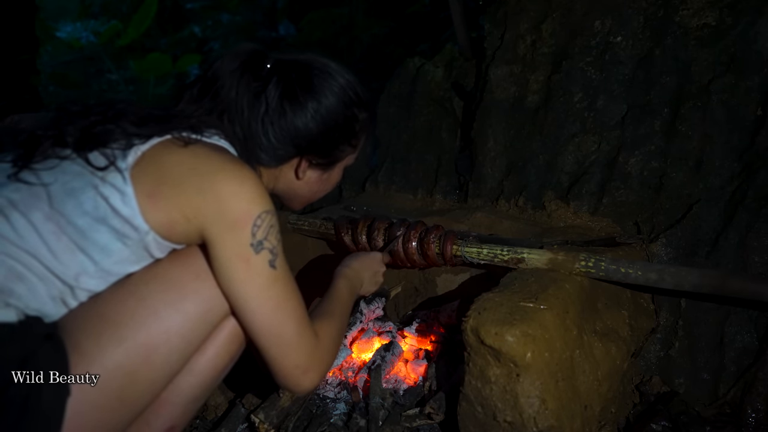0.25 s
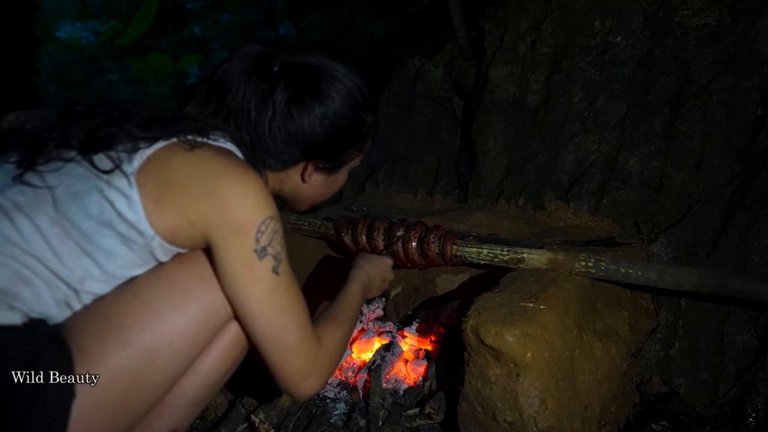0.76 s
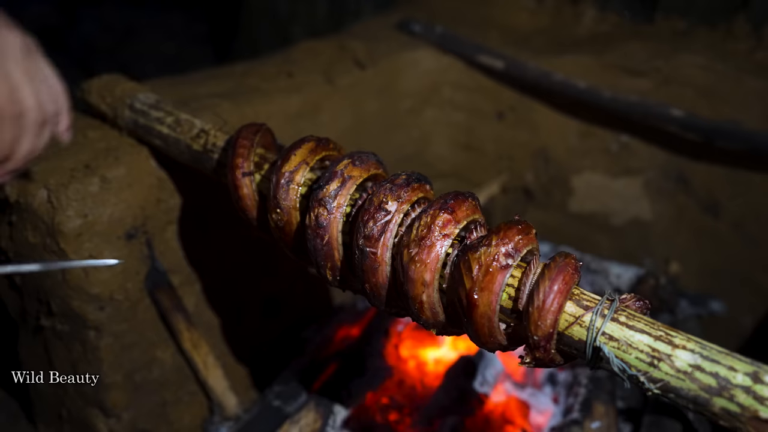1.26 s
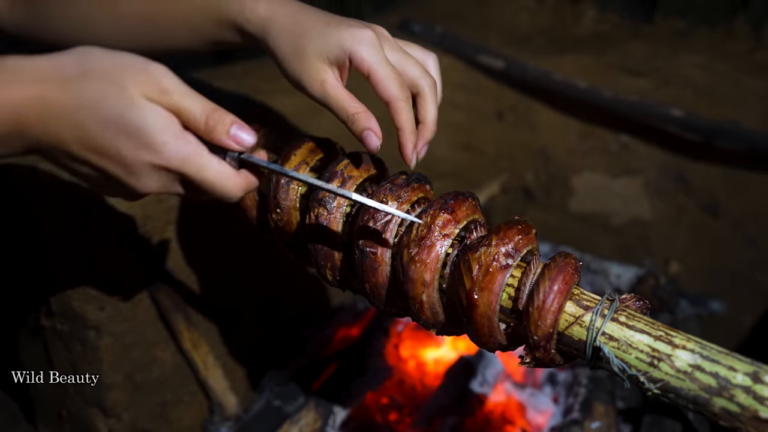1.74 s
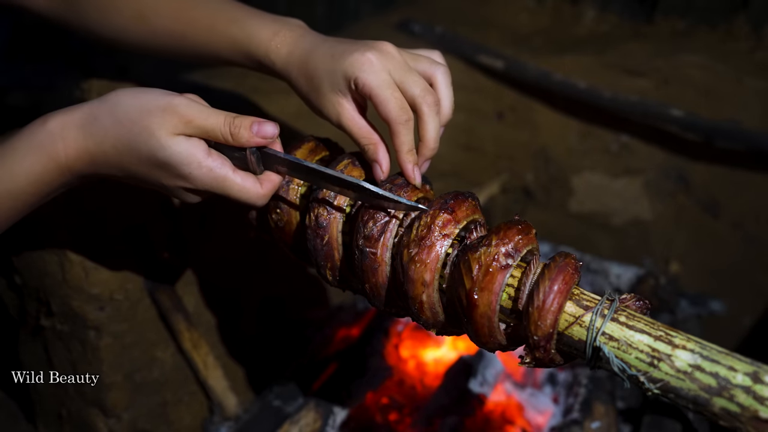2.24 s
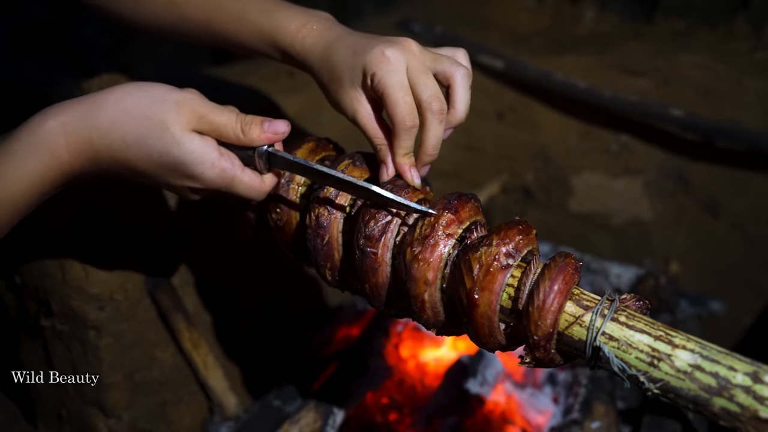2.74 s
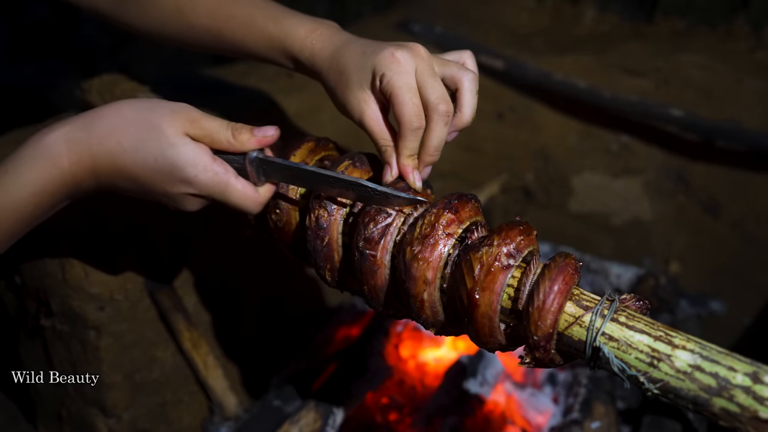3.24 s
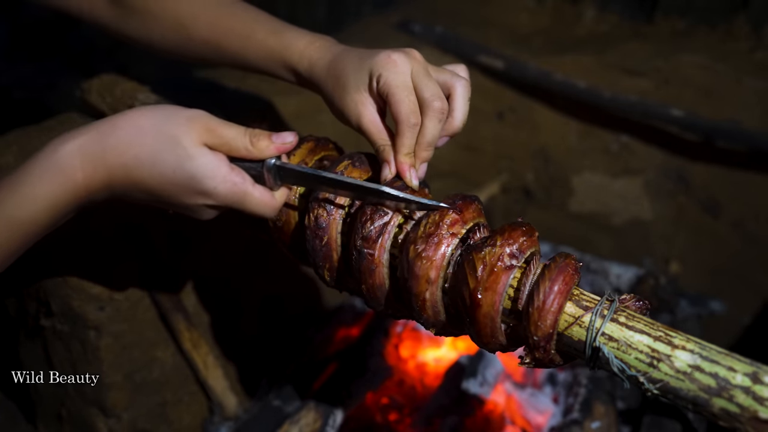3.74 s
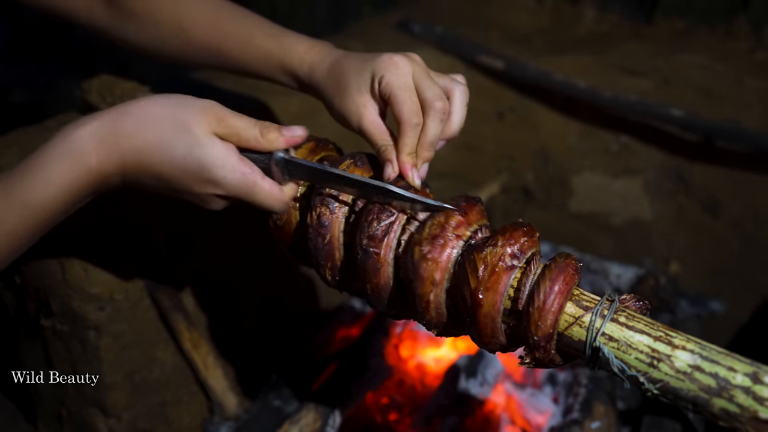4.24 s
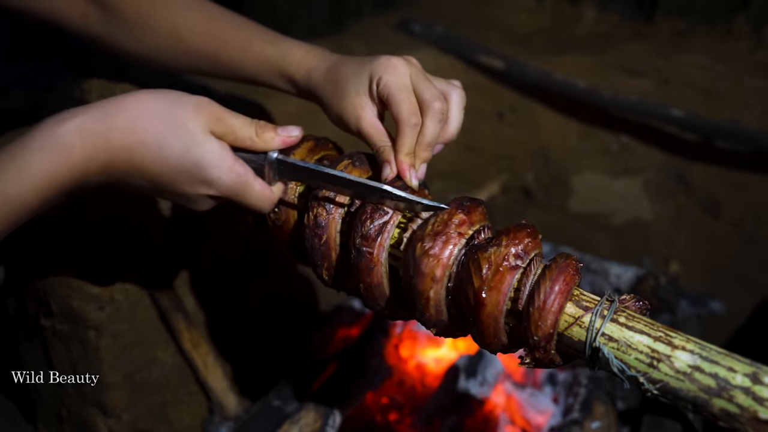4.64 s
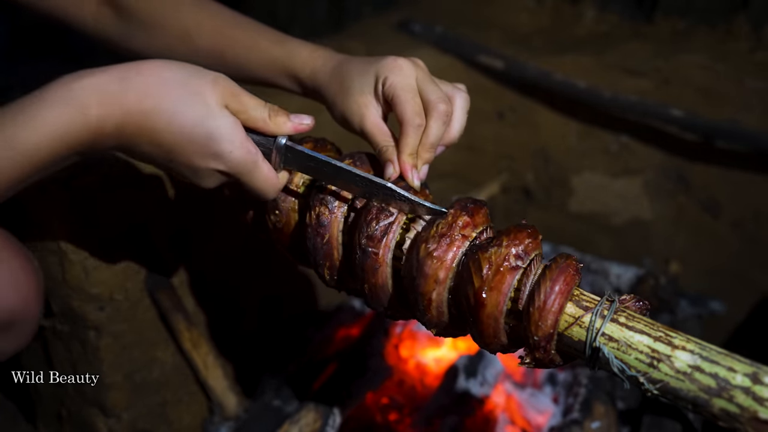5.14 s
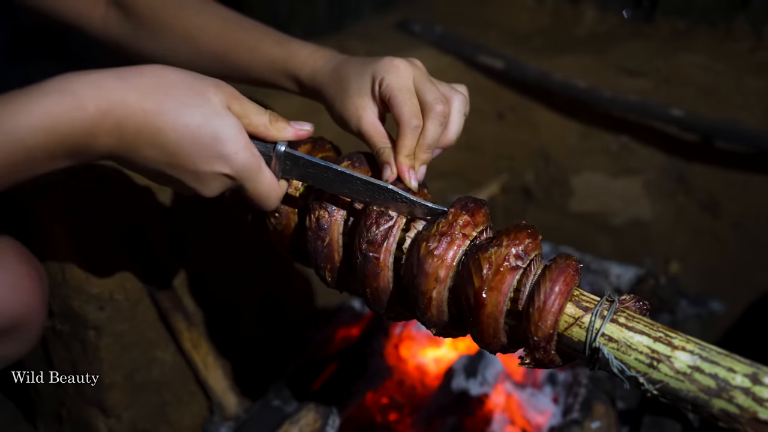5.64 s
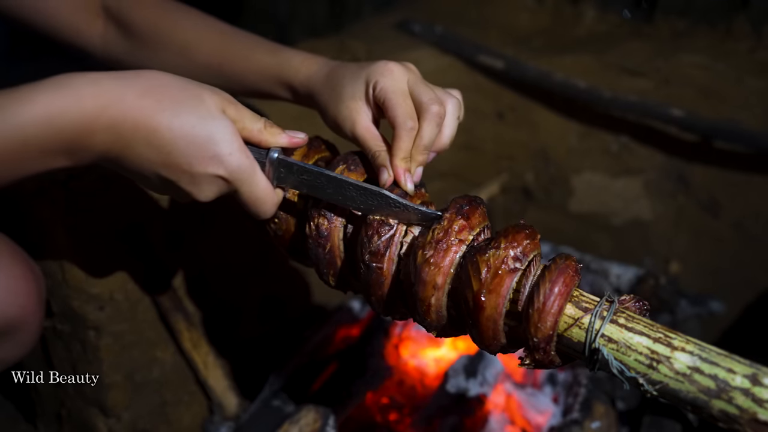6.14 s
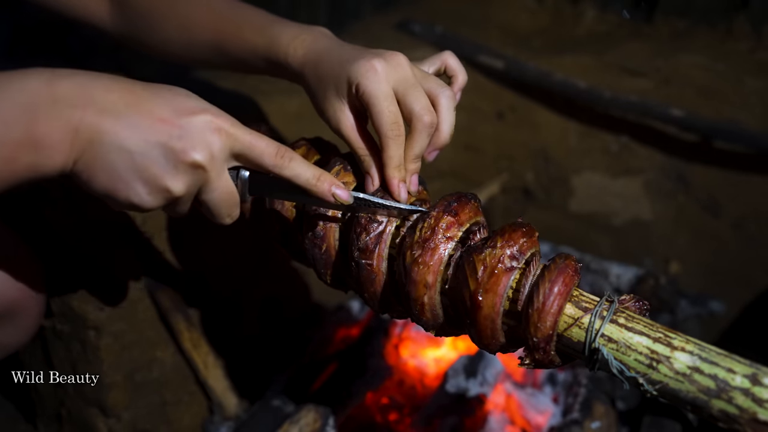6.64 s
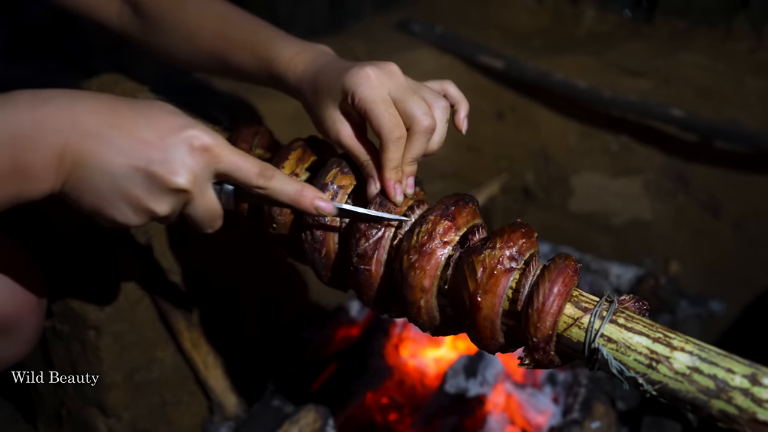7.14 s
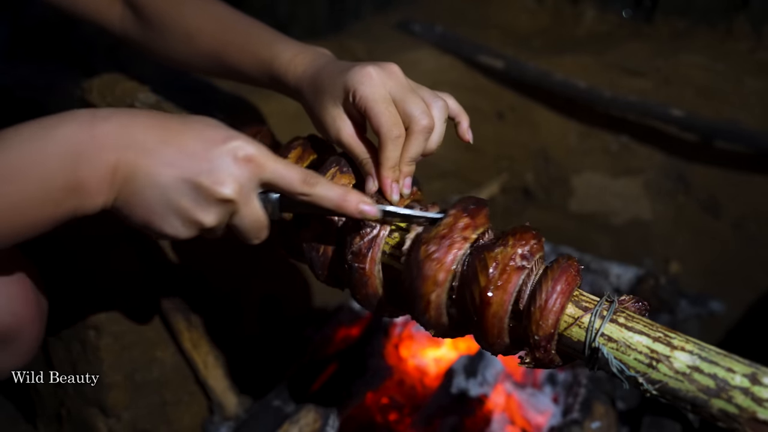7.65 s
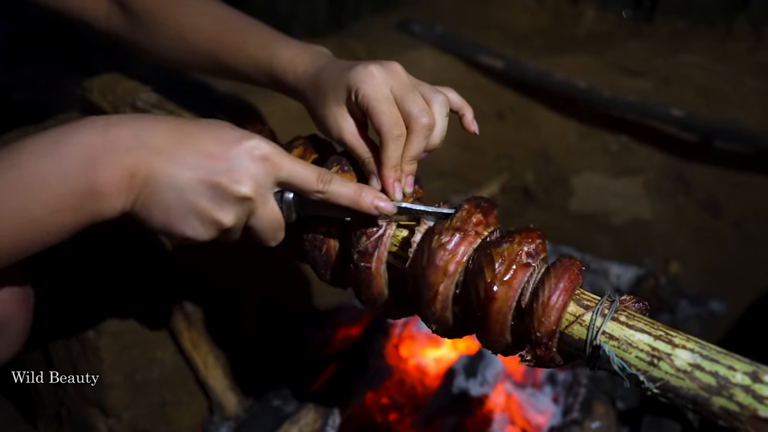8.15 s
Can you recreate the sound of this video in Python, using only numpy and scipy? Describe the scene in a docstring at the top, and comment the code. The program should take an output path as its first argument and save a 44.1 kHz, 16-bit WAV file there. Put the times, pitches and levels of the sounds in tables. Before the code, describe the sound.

A quiet forest night, heard close and dry. From 0 to 1.2 s a steady, high, silvery insect chorus hisses over soft air and faint embers, with rapid thin katydid scrapes about thirteen a second, a faint cricket line and a few small cracks. At 1.4 to 2.4 s come light clicks and a soft bump as the knife touches the meat. From 2.5 s sawing begins, soon settling into short dry rasps about seven per second, with brittle snaps near 3.5 s and a very faint wavering hum around 3 s. The loudest sharp cracks fall at 4.9 to 5.5 s, with tiny steel pings and low spit shudder. Strokes thin out after 6.2 s, leaving insects, small ticks and a soft knock at 6.6 s. Sawing resumes at 6.7 s, duller and thuddier, with fizzing fat and strong crunches at 7.3, 7.6, 7.9 and 8.1 s, continuing until the end at 8.4 s.

```python
"""A far insect chorus hisses in a narrow high band over a bed of embers at night; a katydid chirps at first.
Then a knife saws crisp roast meat on a bamboo spit: strokes rasp, the crust snaps, the spit shudders.
Strokes, snaps and low thuds are bursts of noise and clicks driving the resonances of a tube; the blade rings
after plucks. Insects are pulses or noise in high resonances; forest air is coloured noise; skin and fat
are bright clicks."""
import sys
import numpy as np
from scipy import signal
from scipy.fft import rfft, irfft
from scipy.io import wavfile

SR = 44100
rng = np.random.default_rng(int(sys.argv[2]) if len(sys.argv) > 2 else 0)


def file_out(sig):
    """Save sig as 16-bit WAV at sys.argv[1]."""
    # one column per channel
    cols = np.atleast_2d(sig).T
    # limit, then scale
    lim = np.clip(cols, -1, 1)
    pcm = np.round(lim * 32767).astype(np.int16)
    wavfile.write(sys.argv[1], SR, pcm)


def volts_from_db(level):
    """Convert decibel levels to linear amplitude ratios."""
    exponent = np.asarray(level, float) / 20
    return 10 ** exponent


N = 369999

# Knife strokes. Each row: start in seconds, length in seconds, share of the length before the peak (0-1),
# rasp level in dB before the swell, sizzle in dB relative to the rasp.
STROKES = [(1.861, 0.082, 0.2, -55.5, 8), (2.261, 0.092, 0.4, -58, 4.5), (2.527, 0.11, 0.72, -44.5, -5),
           (2.837, 0.098, 0.17, -52, 6), (2.934, 0.1, 0.64, -42, -9), (3.105, 0.094, 0.63, -40.5, -4.5),
           (3.249, 0.069, 0.24, -35.5, -8.5), (3.4, 0.065, .78, -36, -4), (3.54, 0.062, 0.76, -33, -15),
           (3.667, 0.067, 0.53, -37.5, -3.5), (3.811, 0.072, 0.38, -33, -10),
           (3.965, 0.061, 0.22, -37.5, 0.2), (4.097, .092, 0.67, -34.5, -7),
           (4.276, 0.061, 0.49, -35.5, -0.2), (4.405, 0.085, 0.94, -32.5, -8),
           (4.576, 0.067, 0.78, -34.5, -2), (4.712, 0.086, 0.73, -36.5, -2),
           (4.87, 0.052, 0.77, -30.5, -1.5), (5, 0.081, 0.64, -40, -3.5), (5.147, 0.039, 0.12, -30, 1),
           (5.276, 0.08, 0.72, -34.5, -2), (5.626, .034, 0, -29, -3), (5.759, 0.066, 0.33, -36, -4),
           (5.876, 0.095, 0.64, -36.5, -5.5), (6.04, 0.058, 0.62, -44, -1), (6.194, 0.024, 0.4, -40, -6.5),
           (6.737, 0.091, 1, -45, -6), (6.888, 0.084, 0.75, -43, -1.5), (7.025, 0.07, 0.6, -35, -4.5),
           (7.166, 0.072, .56, -35.5, -5.5), (7.306, 0.063, 0.17, -33, -4.5), (7.441, 0.067, 0.54, -35, -4),
           (7.571, 0.058, 0.15, -33, -11), (7.714, 0.065, 0.79, -30, -4.5), (7.847, 0.03, 0.28, -27.5, -8),
           (7.98, 0.067, 0.9, -33.5, -9.3), (8.105, 0.036, 0.21, -23.5, -21),
           (8.249, 0.069, 0.79, -32, -7.5)]
# Clearest crust snaps, ember cracks and low thuds. Each row: start in seconds, level in dB, pitch in Hz,
# sizzle in dB relative to the level, nominal 60 dB decay in seconds.
SNAPS = [(0.022, -27.5, 2070, -18, 0.057), (.2135, -27.5, 4020, 8, .035), (0.975, -33, 1050, -20, 0.049),
         (1.3724, -34, 1100, -12, .04), (1.4496, -23.5, 4300, 2, .032), (1.9237, -20.5, 3830, 3, 0.019),
         (2.3237, -21.5, 2430, 1, 0.059), (2.528, -23, 3070, 0, 0.11), (2.5858, -13, 2620, -8, 0.035),
         (2.626, -25.5, 450, -15, 0.032), (2.661, -16, 2620, -2.5, 0.037),
         (2.6929, -17.5, 2760, -16, 0.044), (2.8394, -15.5, 2490, 1.5, .03),
         (2.995, -25.5, 450, -15, 0.035), (3.4038, -24, 3060, -16, 0.078), (3.431, -15.5, 490, -15, .079),
         (3.5245, -12, 5300, -16, 0.04), (3.547, -8.5, 2650, -13, 0.06), (3.582, -19, 1720, 16.5, 0.022),
         (3.779, -24, 1680, -15, .032), (3.8287, -10, 1750, -2.1, .035), (3.972, -12, 1700, -22, 0.066),
         (4.1847, -17.5, 3620, 11, 0.054), (4.2824, -13.5, 2880, -15, .031),
         (4.3067, -15, 1590, 3.5, 0.022), (4.5852, -19.5, 1590, 6, .031), (4.615, -21.5, 2760, 13.5, .026),
         (4.739, -25, 1240, 8, 0.069), (4.7696, -19, 6100, -8, 0.026), (4.9312, 3.3, 4500, -0.5, .019),
         (5.0763, -22, 4800, -2.1, 0.031), (5.1398, -6.5, 6340, -15, 0.0081), (5.147, -2.5, 3700, 1, 0.024),
         (5.173, -1.5, 1570, 1, 0.018), (5.3897, -23.5, 2200, -15, .035), (5.4819, -3.5, 1720, 8.5, 0.032),
         (5.5765, -28, 4070, 12, .023), (5.6274, -11.5, 6240, 4.5, .012), (5.8879, -12.5, 1700, -21, 0.047),
         (6.062, -16.5, 2420, -7, 0.032), (6.2003, -9, 2360, -6.5, 0.022), (6.569, -24, 2390, -17, 0.029),
         (6.7576, -15, 1500, 1, 0.021), (6.7846, -15.5, 3020, -17, 0.038), (6.799, -18, 3460, 12, 0.039),
         (6.959, -19.5, 2510, -14, 0.043), (7.038, -19, 3800, -2.1, .038), (7.0852, -14, 1310, -10, 0.026),
         (7.2179, -9, 2500, 8, 0.036), (7.2855, -12, 1890, 4.5, 0.032), (7.3098, 2.5, 1640, -13, 0.065),
         (7.419, -32.5, 3120, 21.5, 0.057), (7.4368, -27.5, 3080, 19.5, 0.056),
         (7.5765, -3, 1320, -19, 0.052), (7.6508, -31.5, 4740, 25.5, 0.021), (7.8481, -5, 690, -24, 0.01),
         (7.8843, -1, 820, -12, 0.028), (8.02, -14.5, 890, 6.5, 0.079), (8.1084, -5, 1830, -25, 0.013),
         (8.126, -3, 2340, -12, 0.096)]
# Ringing of spit, meat and blade. Each row: frequency in Hz, width in Hz, level in dB.
CONTACT_MODES = [(1080, 260, -6), (1300, 220, -5), (1690, 200, -2), (2240, 260, -4), (2660, 280, -3),
                 (3050, 260, -6), (3500, 350, -8), (4100, 500, -7)]
# Changing colour of the cut. Each row: time in seconds, upper modes over lower in dB,
# thud relative to the rasp in dB.
CUT_COLOUR = [(2.5, 1.5, -16), (3.3, 2.5, -13), (3.9, -3.5, -15.5), (4.8, -7.5, -14), (5.3, -3.5, -16),
              (5.8, -3.5, -13.5), (6.8, -1.5, -10.5), (7.4, -8, -9.5), (8.39, -7.5, -9.5)]
# Clearest ticks of splitting skin and spitting fat. Each row: start in seconds, level in dB.
TICKS = [(.7107, -32), (1.632, -25), (2.078, -33.5), (2.539, -26.5), (3.1701, -16), (3.5994, -18),
         (3.6852, -21.5), (3.8418, -22), (3.9007, -29), (4.1423, -25), (4.2334, -28), (4.347, -24.5),
         (4.65, -18.5), (4.8826, -18), (4.9925, -24.5), (5.2547, -24.5), (5.2805, -31), (5.417, -29),
         (5.426, -22.5), (5.956, -19.5), (6.1094, -22.5), (6.1663, -24.5), (6.3388, -27.5), (6.813, -18),
         (6.9053, -27.5), (7.0065, -26.5), (7.0219, -27), (7.133, -28), (7.152, -24), (7.1708, -19.5),
         (7.1857, -25), (7.3542, -21), (7.5074, -16), (7.669, -26), (7.881, -19), (7.9915, -20),
         (8.267, -22)]
# Sideways plucks of the blade. Each row: start in seconds, level in dB.
BLADE_PLUCKS = [(2.1849, -45), (2.2513, -47), (2.3336, -46), (2.5301, -41), (2.575, -43), (2.598, -40),
                (3.14, -42), (3.1542, -36), (3.1694, -38), (3.265, -43), (3.43, -43), (3.4535, -36),
                (3.5249, -26), (3.5798, -33), (4.7681, -29), (4.8808, -32), (5.1482, -22), (5.2294, -48),
                (5.4814, -26), (5.6266, -24)]
# Modes of the steel. Each row: frequency in Hz, width in Hz, level in dB.
BLADE_MODES = [(6050, 130, 0), (6260, 160, -3)]
# A hand bumps the spit. Each row: start in seconds, peak in dB.
KNOCKS = [(1.924, -44.5), (6.644, -45.5)]
# Spit swaying on its supports. Each row: time in seconds, first bending mode in dB, second in dB.
SWAY_LEVELS = [(0.0, -83, -84), (1.89, -80, -63.5), (1.98, -49, -60), (2.19, -71, -67.5),
               (3.29, -57.5, -56.5), (5.16, -50.5, -55.5), (5.21, -43.5, -47), (5.44, -66, -69),
               (5.49, -51, -69), (5.73, -49, -56), (5.86, -53, -68), (5.96, -54, -49), (6.03, -40, -59),
               (6.52, -70, -62), (7.08, -50.5, -55.5), (7.85, -49.5, -57), (7.97, -44.5, -43),
               (8.01, -54, -65), (8.37, -51.5, -54), (8.39, -50, -64)]
# Bending modes of the spit. Each row: frequency in Hz, width in Hz.
SWAY_MODES = [(52, 9.9), (95, 24.5)]
# Katydid chirps. Each entry: start in seconds.
KATYDID_CHIRPS = [.0044, .0697, .1396, .2124, .2932, .3726, .4733, .5744, .6489, .7174, .7966, .8709, .9448,
                  1.04, 1.1248, 1.1897]
# Katydid wing resonances. Each row: frequency in Hz, width in Hz, level in dB.
KATYDID_WING = [(8650, 670, 1), (11300, 1200, -1), (12500, 820, 0)]
# One far cricket. Each row: time in seconds, level in dB.
CRICKET_LEVELS = [(0, -74), (1.2, -79), (1.3, -71), (2.6, -82), (3, -95)]
# A faint wavering hum. Each row: time in seconds, central pitch in Hz, central level in dB.
HUM_TRACK = [(2.68, 530, -83), (2.78, 531, -57), (3.0, 547, -59.5), (3.25, 574, -56), (3.4, 583, -85)]
# The night. Each row: time in seconds, chorus in dB, air and embers in dB, frying fat in dB.
NIGHT_LEVELS = [(0, -55.5, -58, -95), (1.25, -55.5, -58, -85), (1.27, -55.5, -55.5, -70),
                (2.01, -56, -56.5, -67.5), (3.4, -56, -52.5, -65), (5, -55, -54, -68.5),
                (6.4, -55.5, -56.5, -66.5), (7.1, -54, -56.5, -57), (8.39, -52, -51, -61)]
# Chorus wing resonances, passed twice. Each row: frequency in Hz, width in Hz, level per pass in dB.
CHORUS_MODES = [(4180, 620, -4.5), (4622, 520, 3.5), (4855, 310, 4.5), (5116, 320, -0.5),
                (8840, 1330, -8.5)]
# Colour of the air noise. Each row: frequency in Hz, density in dB per Hz.
AIR_COLOUR = [(24, -28), (40, -12), (194, 0), (363, -6.5), (3740, -10), (4800, -13), (5870, -16.5),
              (8770, -20.5), (12500, -22), (16000, -25)]


def rms_one(x):
    """Scale to unit power."""
    return x / np.sqrt(np.mean(x ** 2) + 1e-20)


def in_time(rows):
    """Columns of a curve table, one value per sample."""
    s, *columns = np.transpose(rows)
    return [np.interp(np.arange(N) / SR, s, column) for column in columns]


def band(x, low_hz, high_hz):
    """Butterworth band-pass."""
    return signal.sosfilt(signal.butter(2, [low_hz, high_hz], "band", fs=SR, output="sos"), x)


def resonate(x, hz, width_hz):
    """One resonance with gain 1 on top."""
    r = np.exp(-np.pi * width_hz / SR)
    feed = np.array([1, 0, -1]) * (1 - r * r) / 2
    return signal.lfilter(feed, [1, -2 * r * np.cos(2 * np.pi * hz / SR), r * r], x)


def resonances(x, modes):
    """Resonances side by side, signs alternating."""
    return sum((-1) ** k * volts_from_db(db) * resonate(x, hz, width_hz) for k, (hz, width_hz, db) in enumerate(modes))


def drift(per_s):
    """Slow random curve: straight lines between normal draws of spread 1."""
    knots = rng.standard_normal(800)
    return np.interp(np.arange(N) / SR * per_s, np.arange(800), knots)


def grains(per_s, spread_db):
    """Random clicks of either sign, at unit power; their sizes vary with spread_db."""
    sizes = volts_from_db(spread_db * np.minimum(rng.exponential(1, N), 4)) * rng.choice([-1, 1], N)
    return rms_one(sizes * (rng.random(N) < per_s / SR))


def scattered(per_s, db):
    """Random moments while the knife works: rows of (s, dB, two draws 0-1)."""
    from_s, half_range_db = 2.5, 7
    working_s = N / SR - from_s
    draws = rng.random((60, 4))[:round(per_s * working_s)]
    s = from_s + draws[:, 0] * working_s
    return np.column_stack([s, db + half_range_db * (2 * draws[:, 1] - 1), draws[:, 2:]])


def knife():
    """Each stroke is a swell of dense fibre breaks, cut off where the blade turns round."""
    late_peak_thud_db = 4.5  # extra thud of a slow, late-peaking push, per unit share
    push = np.zeros((3, N))
    base_thud_db = in_time(CUT_COLOUR)[1]
    for start_s, length_s, share, db, sizzle_db in STROKES:
        first, size = round(start_s * SR), round(length_s * SR)
        offsets = np.arange(-size, 2 * size)
        share = np.clip(share, 0.02, 0.95)
        thud_db = base_thud_db[first] + late_peak_thud_db * share
        # an early peak bites at once, a late one creeps in
        swell_db = np.interp(offsets / size, [-1, -0.3 * share, 0, share, 1, 1.2, 2],
                             [-37, -44, -9.5, 5, -3, -27, -18.5])
        where = np.clip(first + offsets, 0, N - 1)
        push[:, where] += volts_from_db(db + swell_db + np.array([[thud_db], [0], [sizzle_db]]))
    breaks = grains(4000, spread_db=4)
    # tearing lasts longer than a snap, so its treble is duller
    tears = rms_one(band(breaks + grains(3000, spread_db=-1.5), 1700, 8550))
    # a few fibres part sharply
    sharp = rms_one(band(grains(1200, spread_db=4.5), 7300, 19600))
    tears = tears + volts_from_db(-8) * sharp
    grip = volts_from_db(3.5 * drift(80) + 2.5 * drift(30))  # the blade catches and slips
    thud, rasp, sizzle = push * grip * [breaks, breaks, tears]
    return spit(thud, rasp, sizzle)


def spit(thud, rasp, sizzle):
    """Three parts of a contact: the dull push into the meat, the ringing tube, the bright tearing crust."""
    push = volts_from_db(13.5) * band(thud, 257, 913) + volts_from_db(7.5) * band(thud, 201, 308)
    tube = volts_from_db(-14) * rasp
    for k, (hz, width_hz, db) in enumerate(CONTACT_MODES):
        # the moving contact favours one mode, then another; every break strikes each mode differently
        favour = volts_from_db(3 * drift(35)) * (1 + rng.standard_normal(N))
        tube = tube + (-1) ** k * resonate(rasp * favour * volts_from_db(db), hz, width_hz)
    # the rasp turns brighter or duller as the blade meets crust or soft meat
    crisp = volts_from_db(in_time(CUT_COLOUR)[0] / 2)
    tube = band(tube, 568, 1856) / crisp - band(tube, 2084, 6200) * crisp
    crust = volts_from_db(-4.5) * band(sizzle, 3760, 10350) + volts_from_db(-12.5) * band(sizzle, 9000, 14400)
    return push + volts_from_db(5) * tube + crust


def snaps():
    """Snap, crack or thud: a sharp click, then a dying flurry of breaks with its own pitch; treble dies first."""
    low_hz, high_hz, small_t60_s = 1300, 4800, 0.031
    thud_at_1khz_db, thud_loss_db_per_octave = -10.5, 6.5  # a low pitch thuds more
    small = [(s, db, low_hz * (high_hz / low_hz) ** pitch, -15 + 22 * bright, small_t60_s)
             for s, db, pitch, bright in scattered(per_s=3, db=-29)]
    size = 6000
    push, own = np.zeros((3, N + size)), np.zeros(N + size)
    noises = rng.standard_normal((len(SNAPS) + 60, size))
    for (s, db, hz, sizzle_db, t60_s), noise in zip(SNAPS + small, noises):
        # decay of thud, rasp and sizzle
        decays_s = np.clip(t60_s, 0.008, 0.13) * np.array([[1.1], [1], [0.55]])
        burst = 0.23 * noise * volts_from_db(-60 * np.arange(size) / SR / decays_s)
        burst[:, 0] = 1.54
        thud_db = thud_at_1khz_db - thud_loss_db_per_octave * np.log2(hz / 1000)
        first = round(s * SR)
        where = slice(first, first + size)
        push[:, where] += volts_from_db(db + np.array([[thud_db], [-6], [sizzle_db]])) * burst
        ring = resonate(resonate(burst[1], hz, 0.23 * hz), hz, 2.3 * hz)
        own[where] += volts_from_db(db + 10) * ring
    thud, rasp, sizzle = push[:, :N]
    return spit(thud, rasp, sizzle) + own[:N]


def ticks():
    """One click with a few milliseconds of fizz, in a wide high band of chance pitch."""
    low_hz, high_hz, t60_s, size = 6360, 12900, 0.022, 800
    rows = TICKS + [(s, db) for s, db, *unused in scattered(per_s=5, db=-33.5)]
    out = np.zeros(N + size)
    noises, pitches = rng.standard_normal((len(TICKS) + 60, size)), rng.random(len(TICKS) + 60)
    for (s, db), noise, pitch in zip(rows, noises, pitches):
        hz = low_hz + pitch * (high_hz - low_hz)
        burst = 0.2 * noise * volts_from_db(-60 * np.arange(size) / SR / t60_s)
        burst[0] = 1.06
        first = round(s * SR)
        out[first:first + size] += volts_from_db(db + 3) * band(burst, 0.23 * hz, min(1.1 * hz, 0.4 * SR))
    return out[:N]


def blade():
    """Short rough plucks into two close modes of the steel."""
    rub_decay_s = 0.006
    plucks = np.zeros(N)
    plucks[[round(s * SR) for s, db in BLADE_PLUCKS]] = volts_from_db(np.array(BLADE_PLUCKS)[:, 1] + 13)
    swell = signal.lfilter([1], [1, -np.exp(-1 / (rub_decay_s * SR))], plucks)
    return resonances(swell * rng.standard_normal(N), BLADE_MODES)


def knocks():
    """A soft blow into a low, quickly damped mode."""
    hz, width_hz = 200, 60
    blows = np.zeros(N)
    blows[[round(s * SR) for s, db in KNOCKS]] = volts_from_db(np.array(KNOCKS)[:, 1])
    return resonate(blows, hz, width_hz) * SR / (width_hz * np.pi)  # rings at the height of the blow


def sway():
    """Two low bending modes, kept going by uneven pushes."""
    uneven_db, pushes_per_s = 3.5, 6
    out = np.zeros(N)
    for db, (hz, width_hz) in zip(in_time(SWAY_LEVELS), SWAY_MODES):
        ring = resonate(resonate(rng.standard_normal(N), hz, 2 * width_hz), hz, width_hz)
        out += volts_from_db(db + uneven_db * drift(pushes_per_s)) * rms_one(ring)
    return out


def katydid():
    """Short scrapes of the wing file: pulses in the wing resonances, under Gaussian swells."""
    level_db, delay_s, half_s = -62, 0.008, 0.013
    time_s = np.arange(N) / SR
    swell = sum(np.exp(-((time_s - s - delay_s) / half_s) ** 2) for s in KATYDID_CHIRPS)
    return volts_from_db(level_db) * swell * rms_one(resonances(grains(6000, spread_db=0), KATYDID_WING))


def cricket():
    """A thin, unsteady line above the chorus: noise through a narrow resonance twice."""
    hz, width_hz = 6340, 120
    line = resonate(resonate(rng.standard_normal(N), hz, width_hz), hz, width_hz)
    return volts_from_db(in_time(CRICKET_LEVELS)[0]) * rms_one(line)


def hum():
    """A rough narrow tone with a weaker third harmonic."""
    hz, db = in_time(HUM_TRACK)
    phase = 2 * np.pi * np.cumsum(hz + 9 * drift(40)) / SR
    return volts_from_db(db + 2.5 * drift(30)) * (np.sin(phase) + 0.5 * np.sin(3 * phase))


def chorus(db):
    """Many far wings overlap: a rain of pulses into close resonances, steep-sided."""
    wings = resonances(resonances(grains(4000, spread_db=2.5), CHORUS_MODES), CHORUS_MODES)
    return volts_from_db(db + 0.7 * drift(11)) * rms_one(wings)


def air(db):
    """Broad background of the forest, with the faint crackle of embers."""
    hz = np.maximum(np.fft.rfftfreq(N, 1 / SR), 1)
    colour_hz, colour_db = np.transpose(AIR_COLOUR)
    colour = volts_from_db(np.interp(np.log(hz), np.log(colour_hz), colour_db))
    hush = rms_one(irfft(rfft(rng.standard_normal(N)) * colour, N))
    crackle = sum(rms_one(resonate(grains(60, spread_db=1.5), mode_hz, 0.73 * mode_hz))
                  for mode_hz in (515, 1050, 1800, 3350))
    return volts_from_db(db + drift(11)) * (hush + volts_from_db(-11) * crackle)


def fat(db):
    """Tiny bright bursts of frying fat, very uneven in size."""
    fizz = band(grains(3000, spread_db=7.5), 6900, 18600)
    return volts_from_db(db + 0.57 * drift(27)) * rms_one(fizz)


def scene():
    """All sources at one microphone, outdoors and close: no room."""
    chorus_db, air_db, fat_db = in_time(NIGHT_LEVELS)
    cutting = knife() + snaps() + ticks() + blade() + knocks() + sway()
    night = katydid() + cricket() + hum() + chorus(chorus_db) + air(air_db) + fat(fat_db)
    return (cutting + night)[None]


def roll_off(x):
    """The treble ends steeply here."""
    return signal.sosfilt(signal.butter(12, 16990, fs=SR, output="sos"), x)


def record(dry):
    """Cuts the top steeply at 15.8 kHz and returns the finished mix."""
    steep = signal.ellip(10, 1, 32, 15800, fs=SR, output="sos")
    mix = signal.sosfilt(steep, dry)
    return roll_off(mix)


dry = scene()
out = record(dry)
file_out(out)
```